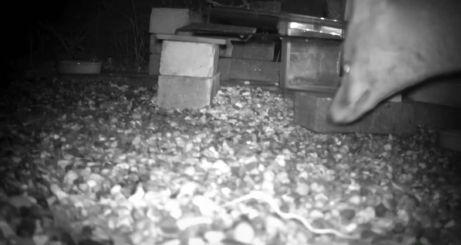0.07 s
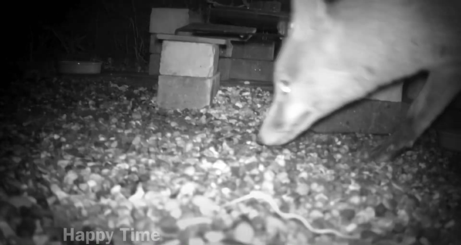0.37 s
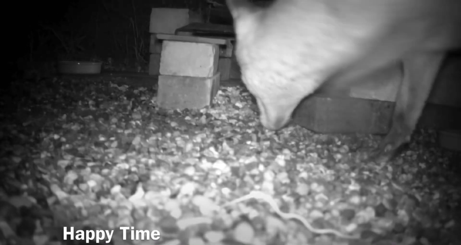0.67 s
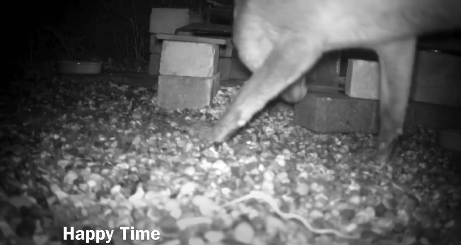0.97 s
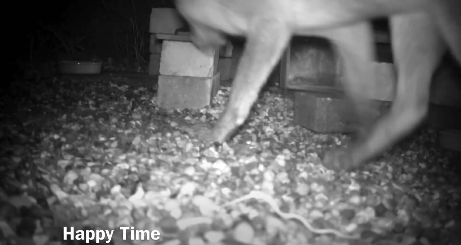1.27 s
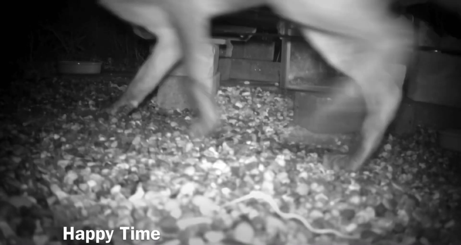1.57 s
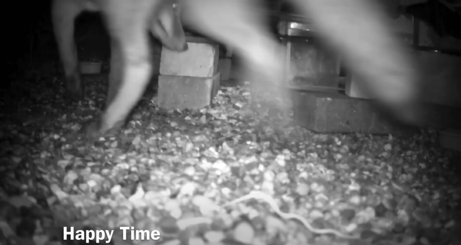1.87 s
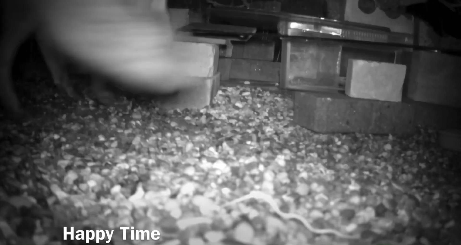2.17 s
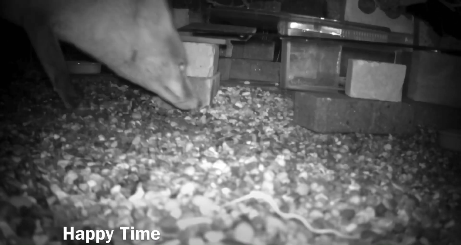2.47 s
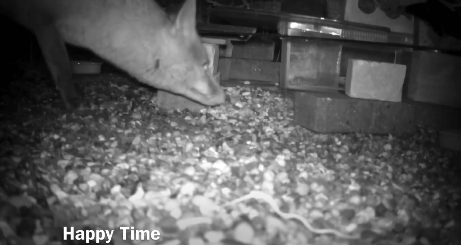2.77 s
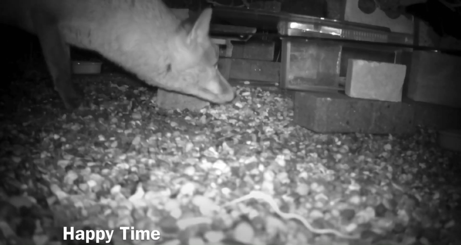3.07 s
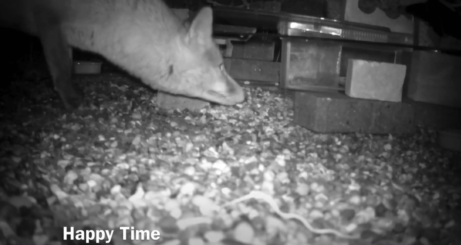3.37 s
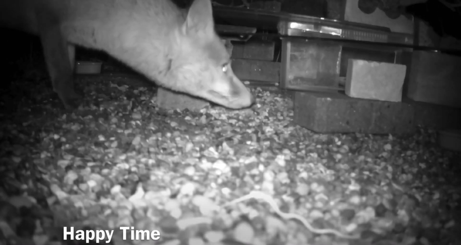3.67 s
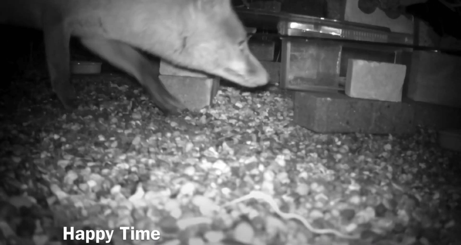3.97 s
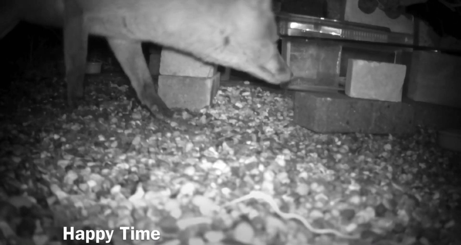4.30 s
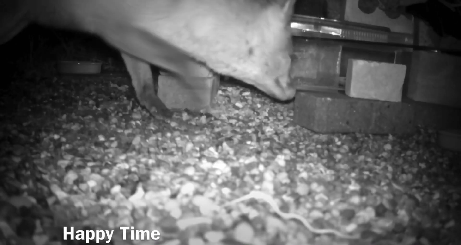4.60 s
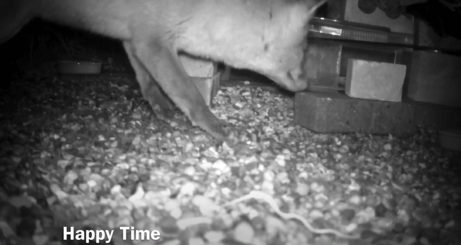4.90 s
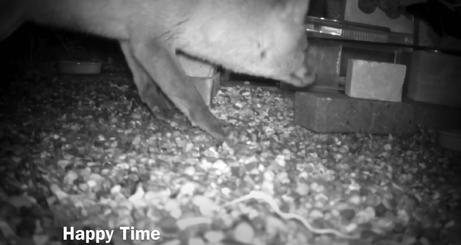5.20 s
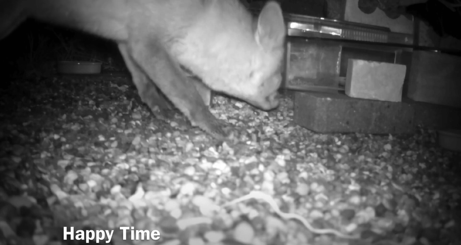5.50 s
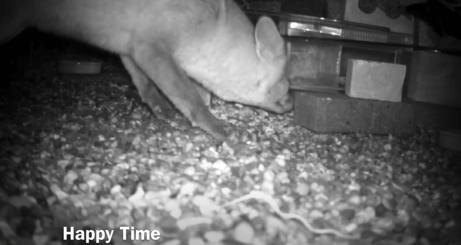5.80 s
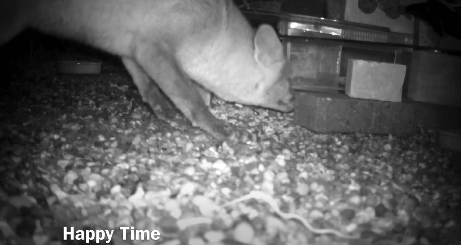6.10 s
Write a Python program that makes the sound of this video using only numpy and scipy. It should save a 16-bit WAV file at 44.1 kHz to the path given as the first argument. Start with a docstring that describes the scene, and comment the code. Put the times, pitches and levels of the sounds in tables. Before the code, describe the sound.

Soft, uneven animal steps on gravel, with small stones clicking, against a quiet distant traffic hum and faint hiss.

```python
"""A low town rumble and the wash of distant traffic fade in around a yard at night.
Close by, a fox walks and noses about on gravel: its paws press the pebbles into a fine crunch,
single stones click, and walls give a short echo. A low exhaust throb comes and goes; near the end
a far engine drones nearer. A dull microphone cuts off the high treble."""
import sys
import numpy as np
from scipy import signal
from scipy.fft import rfft, irfft
from scipy.io import wavfile
from scipy.ndimage import uniform_filter1d

SR = 44100
rng = np.random.default_rng(int(sys.argv[2]) if len(sys.argv) > 2 else 0)


def dump(signal):
    """Clip the signal to [-1, 1] and save it as 16-bit WAV at the path in sys.argv[1]."""
    limited = np.clip(np.atleast_2d(signal).T, -1, 1)
    pcm = np.round(limited * 32767).astype(np.int16)
    wavfile.write(sys.argv[1], SR, pcm)


N = 275625
TIME = np.arange(N) / SR
MIC_TOP_HZ = 7350


def undb(db):
    """Decibels to gain."""
    return 10 ** (np.asarray(db) / 20)


def unit(x):
    """Scale to rms 1."""
    return x / np.sqrt(np.mean(x ** 2))


def curve(rows):
    """Linear interpolation of (time, value) rows."""
    return np.interp(TIME, *np.transpose(rows))


def envelope(age_s, length_s, attack_s, release_s):
    """Linear rise, hold until length_s, exponential decay."""
    return np.clip(age_s / attack_s, 0, 1) * np.exp(-np.maximum(age_s - length_s, 0) / release_s)


def wander(rate_hz):
    """Smooth random drift, rms 1."""
    hold = int(SR / rate_hz)
    steps = np.repeat(rng.standard_normal(N // hold + 1), hold)
    return unit(uniform_filter1d(uniform_filter1d(steps, hold), hold)[:N])


def colour(x, spectrum):
    """Minimum-phase filter from (frequency, gain) rows, via the cepstrum."""
    hz, db = np.transpose(spectrum)
    bins_hz = np.arange(N + 1) * SR / (2 * N)
    gain = undb(np.interp(np.log(bins_hz + 1), np.log(hz), db))
    cepstrum = irfft(np.log(gain))
    cepstrum[1:N] *= 2
    cepstrum[N + 1:] = 0
    return irfft(rfft(x, 2 * N) * np.exp(rfft(cepstrum)))[:N]


def resonance(x, hz, width_hz):
    """One resonance, unity gain at centre."""
    return signal.lfilter(*signal.iirpeak(hz, hz / width_hz, fs=SR), x)


def noise_band(hz, width_hz):
    """Noise through two equal resonances, each width_hz wide; rms 1."""
    once = resonance(rng.standard_normal(N), hz, width_hz)
    return unit(resonance(once, hz, width_hz))


def treble(x, edge_hz=5200):
    """Zero-phase band from edge_hz to just past the microphone's limit."""
    bandpass = signal.butter(4, [edge_hz, MIC_TOP_HZ + 400], "band", fs=SR, output="sos")
    return signal.sosfiltfilt(bandpass, x)


# town rumble: (time [s], level [dB])
RUMBLE_LEVEL = [(.34, -70), (.46, -59.5), (.7, -60), (1.2, -53), (2.2, -58), (4.7, -54.5), (6.2, -63.5)]


def town_rumble():
    """Deep town noise, swelling and ebbing."""
    return noise_band(hz=85, width_hz=35) * undb(curve(RUMBLE_LEVEL))


# background fade: (time [s], gain [dB])
FADE_GAIN = [(.335, -18.5), (.45, -13.5), (.6, -8.5), (.8, -4), (1.05, -0.52), (6.25, .5)]


def fade_in():
    """Rising gain for traffic, engines and idle pebbles."""
    return undb(curve(FADE_GAIN))


# traffic wash: (frequency [Hz], gain [dB])
WASH_SPECTRUM = [(8, -4.5), (20, 6.5), (55, -1.5), (88, -5), (135, -6), (270, -8), (340, -10), (395, -17.5),
                 (500, -7), (680, -8.5), (810, -11), (1000, -9.5), (1220, -12), (1500, -36)]
# faint hiss: (frequency [Hz], gain [dB])
HISS_SPECTRUM = [(900, -7), (1400, 4), (1750, 0), (2050, -5.5), (2900, -14), (3500, -22), (4400, -29),
                 (5200, -36), (6800, -26.5), (7500, -37.5), (9000, -55)]
# passing tyres: (time [s], gain [dB])
TYRE_SWELL = [(.4, -2.5), (1.2, 0), (2.3, -1), (3.3, 0.5), (4.3, -0.8), (5.1, -2.5), (6.2, -1.5)]


def traffic(wash_db=-46.0, boom_db=-55, hiss_db=-62.5, cutoff_hz=1650, tyre_hz=850):
    """Dull wash, one booming resonance, thin hiss; the mids swell as far tyres pass."""
    swell = undb(curve(TYRE_SWELL))
    lowpass = signal.butter(6, cutoff_hz, fs=SR, output="sos")
    wash = unit(signal.sosfilt(lowpass, colour(rng.standard_normal(N), WASH_SPECTRUM)))
    wash += (swell - 1) * treble(wash, tyre_hz)
    boom = noise_band(hz=239, width_hz=23) * undb(boom_db)
    hiss = unit(colour(rng.standard_normal(N), HISS_SPECTRUM))
    hiss_top = treble(hiss)
    hiss = swell * (hiss - hiss_top) + hiss_top
    wash *= undb(wash_db + .5 * wander(8.3))
    hiss *= undb(hiss_db + .32 * wander(4.1))
    return wash + boom + hiss


def engine_tone(hz, waver_hz, flutter_db):
    """One engine line, wavering in pitch and level; rms 1."""
    phase = 2 * np.pi * np.cumsum(hz + waver_hz * wander(12)) / SR
    return unit(np.sin(phase) * undb(flutter_db * wander(9)))


# exhaust throb: (start [s], length [s], level [dB])
THROB_SPELLS = [(0.998, .4, -55), (1.524, .55, -44.5), (2.3, 0.39, -45), (2.693, .88, -46)]


def exhaust_throb(hz=37.84, rise_s=.067, fall_s=.076):
    """Low exhaust tone that comes and goes."""
    spells = sum(undb(db) * envelope(TIME - start_s, length_s, rise_s, fall_s)
                 for start_s, length_s, db in THROB_SPELLS)
    return engine_tone(hz, waver_hz=.9, flutter_db=.5) * spells


# far engine at its nearest: (frequency [Hz], level [dB])
ENGINE_LINES = [(120, -62), (150.7, -53.5), (193.8, -54.5), (237, -58.5), (271.6, -56.5), (430.7, -59),
                (452.2, -60)]


def far_engine(roar_db=-55, nearest_s=5.95, rise_db_per_s=15.5):
    """Droning lines in a rough roar; draws nearer, then holds."""
    drone = sum(undb(db) * engine_tone(hz, waver_hz=1.6, flutter_db=2.0) for hz, db in ENGINE_LINES)
    roar = noise_band(hz=180, width_hz=160) * undb(roar_db)
    nearness = undb(rise_db_per_s * np.minimum(TIME - nearest_s, 0))
    return (drone + roar) * nearness


def yard_echo(x, t60_s=.094, gap_s=.004, echo_db=-13):
    """Direct sound plus short scatter off blocks and walls."""
    t = np.arange(SR // 3) / SR
    tail = rng.standard_normal(len(t)) * undb(-60 * t / t60_s) * (t > gap_s)
    return x + undb(echo_db) * signal.fftconvolve(x, tail / np.linalg.norm(tail))[:N]


def pebble_contacts(per_s, spread_db, width_hz, ring_gain):
    """Pebbles of many sizes touch at random: tiny cracks, each ringing a few cycles."""
    grains = np.zeros(N)
    pitches_hz = np.geomspace(1700, 7000, 22)
    signs = rng.choice([-1, 1], N)
    strengths = undb(spread_db * np.minimum(rng.exponential(size=N), 4))
    for hz in pitches_hz:
        contacts = (rng.random(N) < per_s / len(pitches_hz) / SR) * signs * strengths
        grains += ring_gain * resonance(contacts, hz, width_hz) + .3 * contacts
    return unit(grains)


# paw presses, drags, shifts: (start [s], length [s], relative level [dB], treble share [dB])
PAW_PRESSES = [(0.427, 0.026, -75, -12), (0.51, 0.34, -74, -12.5), (0.572, 0.027, -65.5, -8),
               (0.831, 0.062, -56, -18), (0.877, 0.41, -62, -15), (0.933, 0.021, -58.5, -14),
               (1.041, 0.028, -55.5, -9), (1.15, 0.31, -61, -13), (1.47, 0.12, -57, -12),
               (1.588, 0.068, -66, -16), (1.803, 0.24, -62.5, -16.5), (1.993, 0.41, -57, -19),
               (2.072, 0.041, -51.5, -22), (2.211, 0.032, -53.5, -18), (2.348, 0.028, -59, -16),
               (2.404, 0.098, -66.5, -17), (2.504, .038, -52, -15), (2.555, 0.05, -63.5, -20),
               (2.67, 0.11, -66, -14), (2.795, 0.026, -61, -23), (2.91, 0.019, -59.5, -22.5),
               (2.947, 0.048, -68, -20), (3.17, 0.086, -73, -14.5), (3.774, 0.19, -70, -12),
               (4.035, 0.078, -61, -12.5), (4.134, 0.08, -62.5, -15), (4.2, 0.13, -70.5, -16),
               (4.405, 0.019, -59, -23), (4.46, 0.21, -65, -18), (4.607, 0.029, -55.5, -16),
               (4.687, 0.084, -53.5, -19), (4.762, 0.05, -55, -19.5), (4.81, 0.043, -61, -17),
               (5.507, 0.23, -73, -12), (5.538, 0.011, -64, -21), (5.645, .035, -65, -22.5),
               (5.762, .02, -68, -22), (5.845, 0.0076, -56, -23), (5.886, 0.13, -77, -18)]


def paw_load(attack_share=.22, sag_db=3.5, settle_s=.018):
    """Body and treble gains: weight comes on, pebbles pack, then settle. Presses add in power."""
    body_power, top_power = np.zeros(N), np.zeros(N)
    for start_s, length_s, db, treble_db in PAW_PRESSES:
        span = slice(int(start_s * SR), int(start_s * SR) + SR)
        age_s = TIME[span] - start_s
        packed = np.clip(age_s / length_s, 0, 1)
        weight = envelope(age_s, length_s, attack_share * length_s, settle_s)
        power = (weight * undb(db - sag_db * packed)) ** 2
        body_power[span] += power
        top_power[span] += power * undb(treble_db) ** 2
    return np.sqrt(body_power), np.sqrt(top_power)


# gravel bed: (frequency [Hz], gain [dB])
GRAVEL_SPECTRUM = [(500, -30.5), (1200, 2), (1700, -2.5), (2300, -0.5), (2600, -1), (3000, -1.5),
                   (3300, -8), (4250, -8.5), (4850, -17.5), (5400, -20.5), (6000, -18), (6900, -16),
                   (7450, -28.5), (9000, -51.5)]


def gravel_crunch(rub_db=-10, loose_db=-8, idle_db=-82, uneven_db=2.5):
    """Fine gravel slips under rubbing pads; larger loose pebbles tip over, even between steps."""
    fine = pebble_contacts(per_s=2000, spread_db=2.5, width_hz=490, ring_gain=1.0)
    pad_rub = undb(rub_db) * rng.standard_normal(N)
    fine = unit(colour(fine + pad_rub, GRAVEL_SPECTRUM))
    fine /= np.sqrt(uniform_filter1d(fine ** 2, SR // 40) + 1e-6)  # levelled: paw load sets the power
    loose = pebble_contacts(per_s=75, spread_db=3.0, width_hz=380, ring_gain=2.2)
    loose = unit(colour(loose, GRAVEL_SPECTRUM))
    grains = fine + undb(loose_db) * loose
    top = treble(grains)
    body_gain, top_gain = paw_load()
    pressed = unit(grains - top) * body_gain + unit(top) * top_gain
    pressed *= undb(uneven_db * wander(70))  # pebbles give way in fits
    return pressed + loose * undb(idle_db) * fade_in()


# stone on stone: (time [s], relative peak [dB], ring [Hz], treble share before trim [dB])
STONE_KNOCKS = [(.7967, -51.5, 2640, -9), (0.837, -45.5, 2730, -20), (.876, -47, 2300, -15),
                (0.991, -52, 2890, 4), (1.0077, -57, 2720, 0), (1.0652, -44, 2340, -18),
                (1.0897, -57, 2360, -6), (1.2808, -45, 6770, -1), (1.3452, -39, 2110, -15),
                (1.4135, -40.5, 2670, -16), (1.4941, -48.5, 2310, -8), (1.5178, -38.5, 2400, -28),
                (1.53, -44.5, 2400, -19), (1.6387, -45, 2040, -17), (1.6478, -40.5, 2200, -23),
                (1.773, -46, 2820, -30), (1.8515, -37, 2800, -26), (1.863, -31.5, 2900, -15.5),
                (1.9927, -44.5, 2150, -27), (2.086, -48, 2840, -26), (2.0998, -40, 2100, -26),
                (2.1077, -40, 2440, -27), (2.1244, -45, 2340, -9), (2.179, -41, 2890, -22),
                (2.352, -45, 2580, -18), (2.5165, -44, 2150, -10), (2.638, -52, 2390, -7),
                (2.7577, -49.5, 2820, -6), (2.923, -48.5, 2790, -26), (3.2063, -53, 2150, -16),
                (3.903, -51.5, 2720, -27), (4.2426, -45.5, 2170, -24), (4.478, -48, 2070, -15),
                (4.616, -44, 2000, -22), (4.6307, -37, 2720, -37), (4.6343, -35, 2820, -30),
                (4.7106, -39, 2630, -16), (4.7915, -40, 2340, -23), (4.811, -42, 2610, -15),
                (4.878, -45, 2630, -24), (4.9306, -44.5, 2850, -21), (5.0848, -53, 2730, -9),
                (5.549, -44, 2530, -21), (5.6698, -47, 2620, -24), (5.716, -50.5, 2300, -20),
                (5.764, -47.5, 2370, -28), (5.7754, -46.5, 2500, -28), (5.852, -47, 2840, -13),
                (5.907, -47, 2550, -24), (5.98, -48, 2570, -21), (6.0646, -46, 2530, -20)]


def stone_clicks(contact_s=.0015, scrape_s=.0059, scrape_db=-19, crack_db=-2.5,
                 ring_s=.002, rise_s=.00037, upper_ratio=1.29, upper_db=-6, roll_off_hz=3300,
                 trim_below_db=-42, trim_db_per_db=.2):
    """A stone cracks against its neighbour, rings in two modes and scrapes to rest."""
    size = SR // 20
    t = np.arange(size) / SR
    bed_response = colour(signal.unit_impulse(N), GRAVEL_SPECTRUM)[:size]
    clicks = np.zeros(N + size)
    for time_s, db, hz, treble_db in STONE_KNOCKS:
        noise = rng.standard_normal(size)
        force = noise * (np.exp(-t / contact_s) + undb(scrape_db) * np.exp(-t / scrape_s))
        crack = signal.fftconvolve(force, bed_response)[:size]
        top = treble(crack)
        upper_hz = hz * (upper_ratio + .047 * noise[-1])  # random detune per stone
        upper_gain = undb(upper_db) / np.hypot(1, (upper_hz / roll_off_hz) ** 6)
        modes = np.sin(2 * np.pi * hz * t) + upper_gain * np.sin(2 * np.pi * upper_hz * t)
        ring = modes * np.exp(-t / ring_s) * (1 - np.exp(-t / rise_s))
        body = unit(unit(ring) + undb(crack_db) * unit(crack - top))
        treble_trim_db = trim_db_per_db * min(db - trim_below_db, 0)  # quieter clicks: less treble gain
        click = body + undb(treble_db + treble_trim_db) * unit(top)
        start = int(time_s * SR)
        clicks[start:start + size] += undb(db) * click / np.abs(click).max()
    return clicks[:N]


def scene():
    """Fox on gravel over the night background; mono."""
    fox = yard_echo(undb(-.4) * gravel_crunch() + undb(-1.1) * stone_clicks())
    background = (traffic() + exhaust_throb() + far_engine()) * fade_in() + town_rumble()
    return (background + fox)[None]


def record(dry):
    """Microphone: wakes late, hisses faintly, passes no high treble."""
    wake_s, ramp_s, hiss_db = .335, .002, -88
    awake = np.clip((TIME - wake_s) / ramp_s, 0, 1)
    heard = dry + undb(hiss_db) * rng.standard_normal(N)
    lowpass = signal.ellip(10, .2, 70, MIC_TOP_HZ, fs=SR, output="sos")
    return signal.sosfilt(lowpass, heard * awake)


dry = scene()
out = record(dry)
dump(out)
```